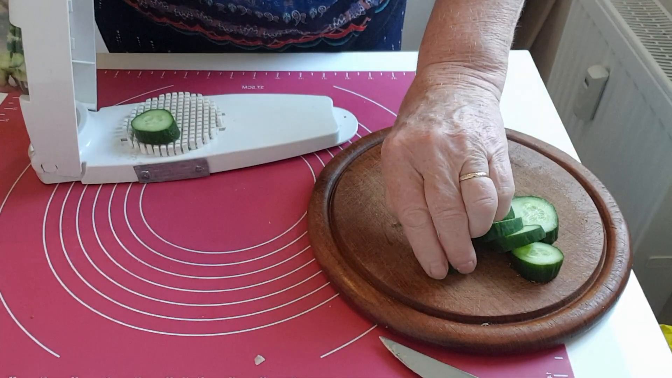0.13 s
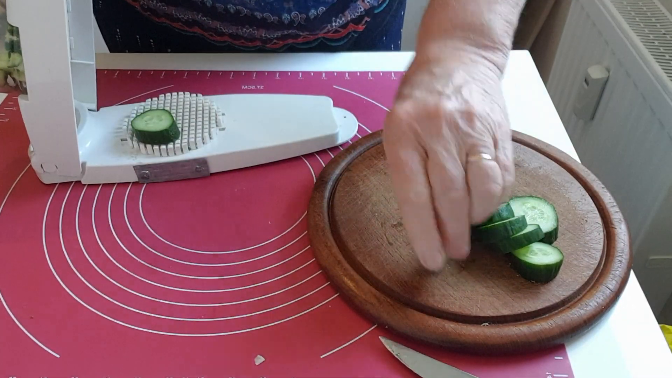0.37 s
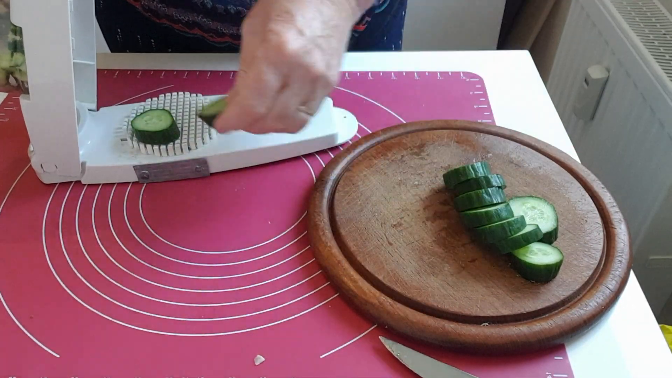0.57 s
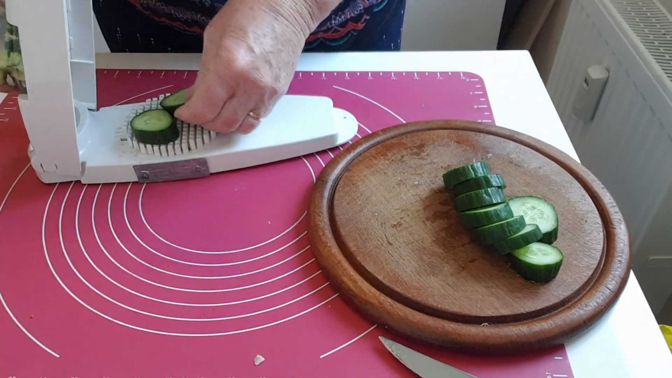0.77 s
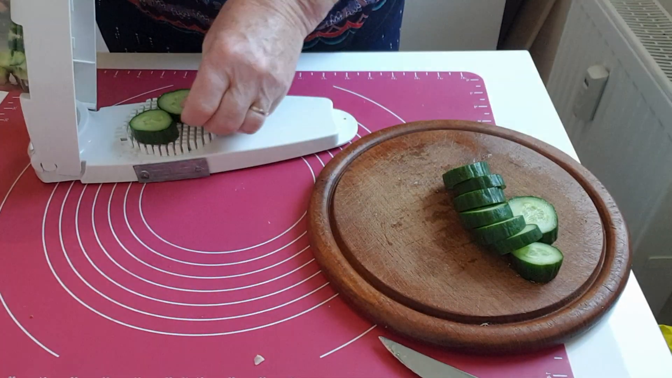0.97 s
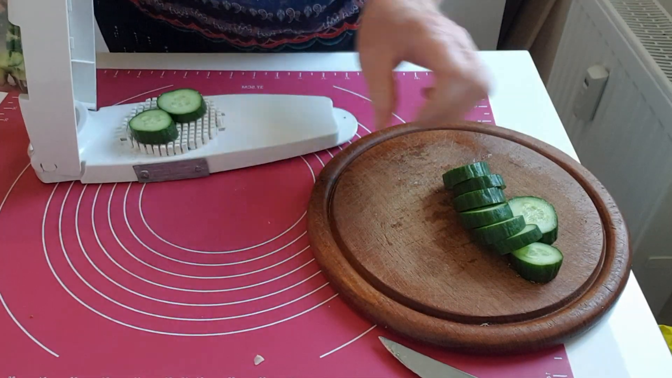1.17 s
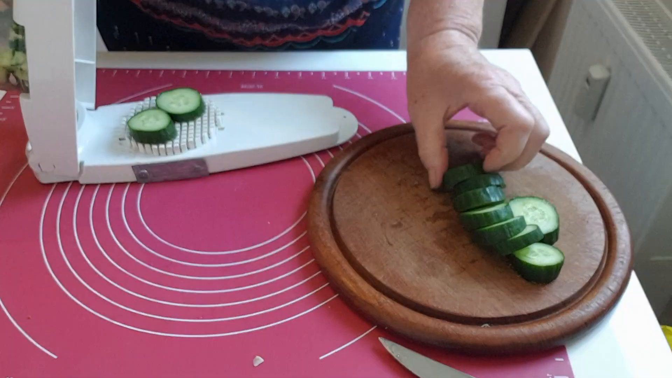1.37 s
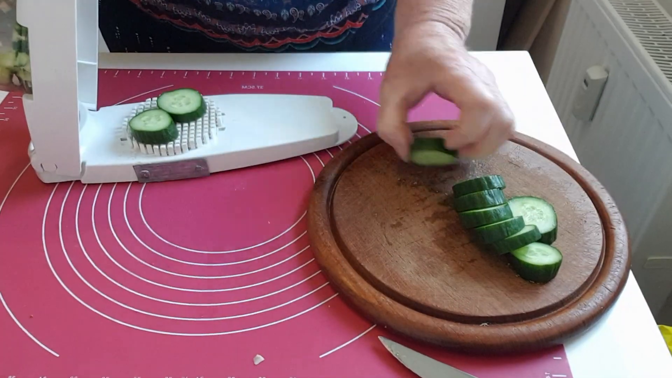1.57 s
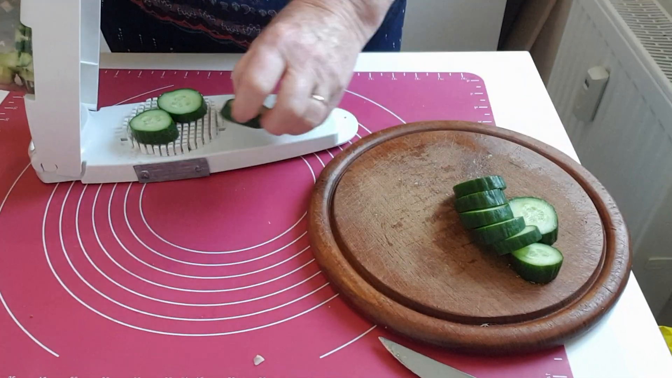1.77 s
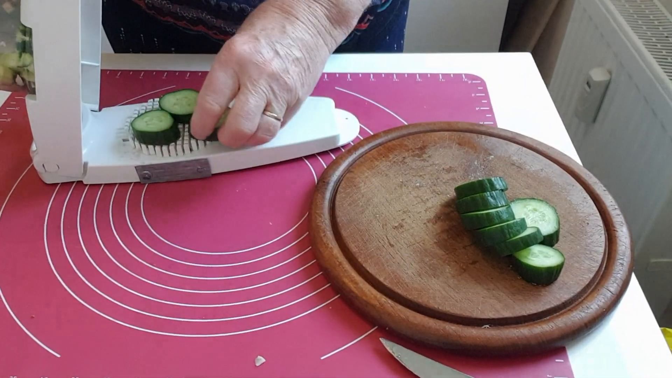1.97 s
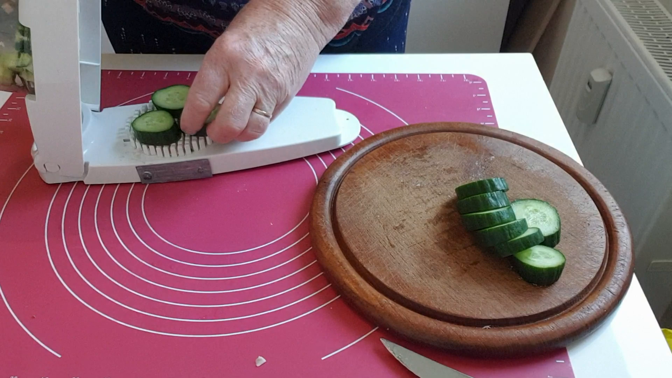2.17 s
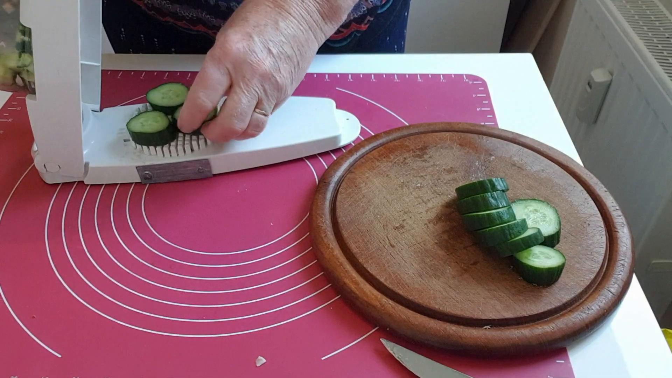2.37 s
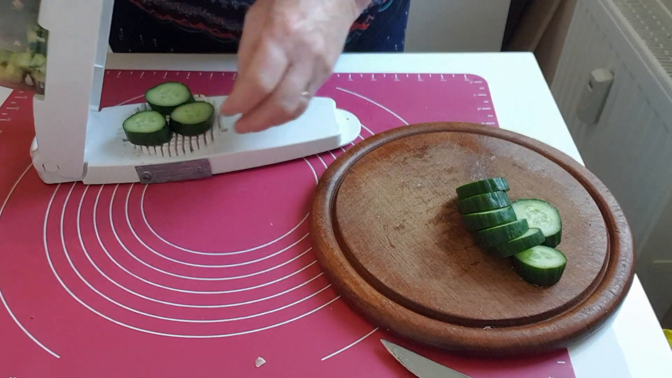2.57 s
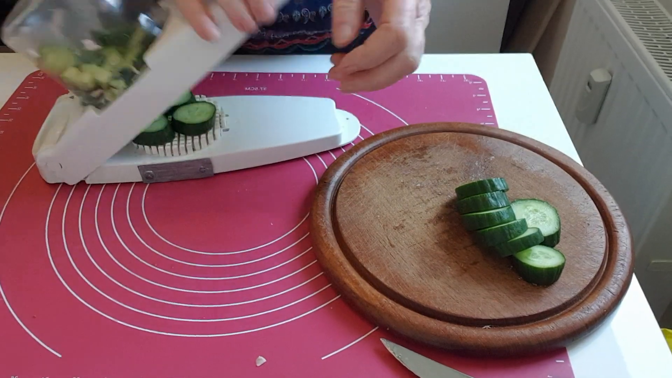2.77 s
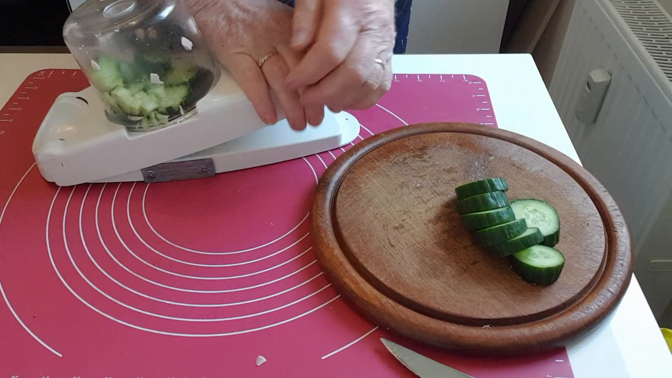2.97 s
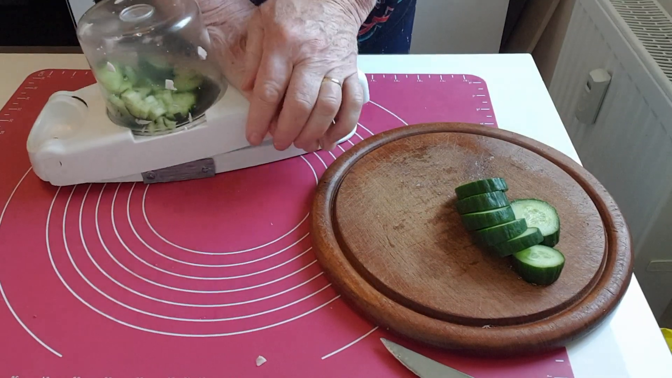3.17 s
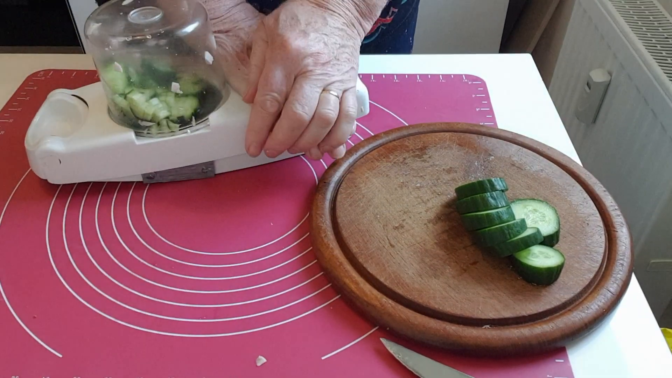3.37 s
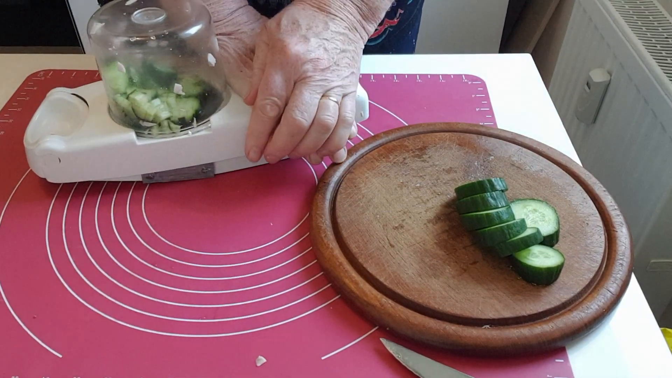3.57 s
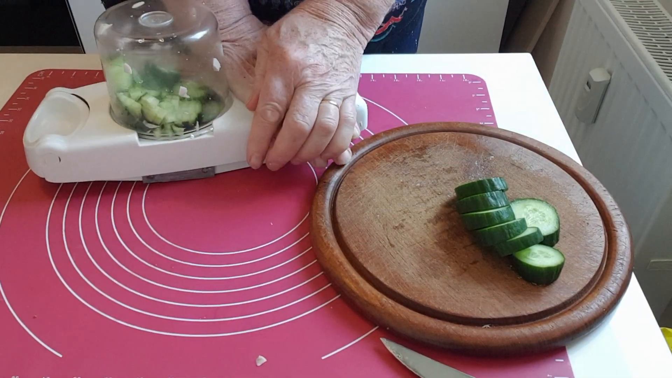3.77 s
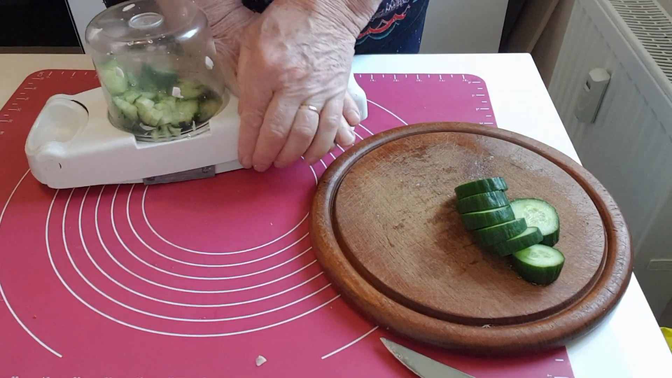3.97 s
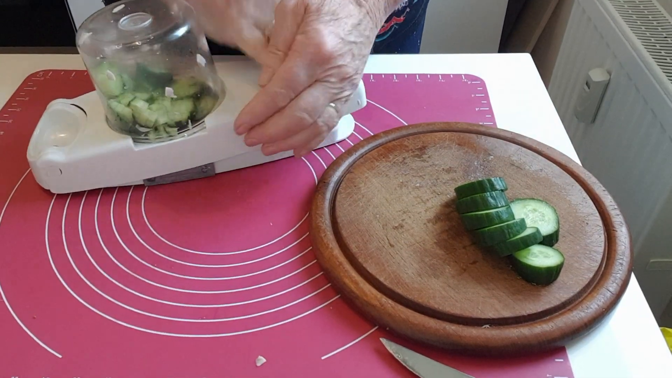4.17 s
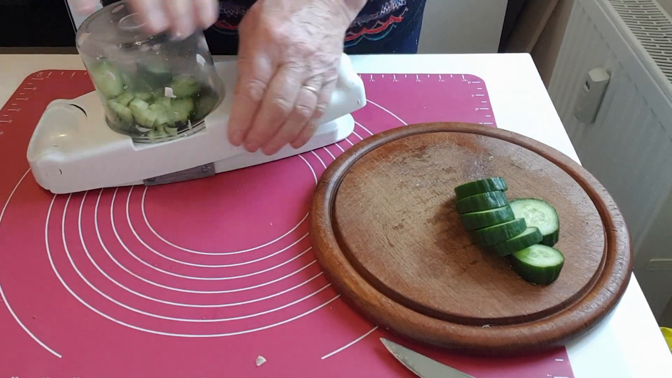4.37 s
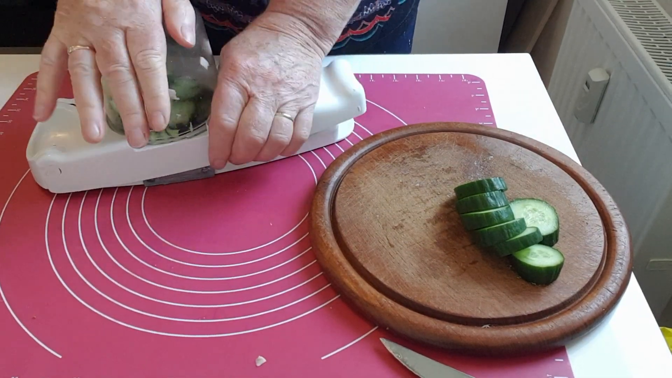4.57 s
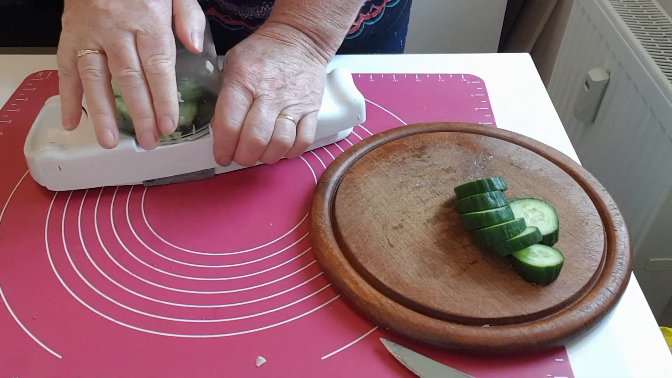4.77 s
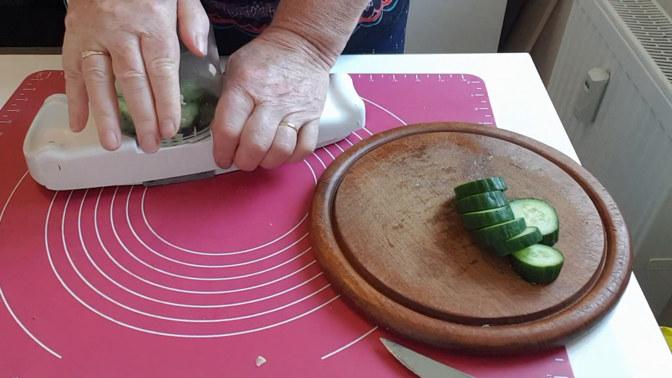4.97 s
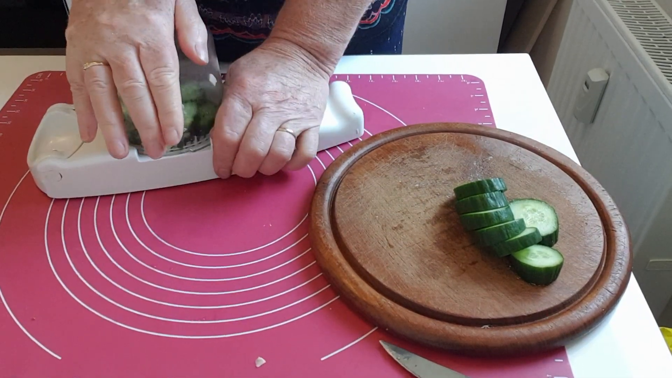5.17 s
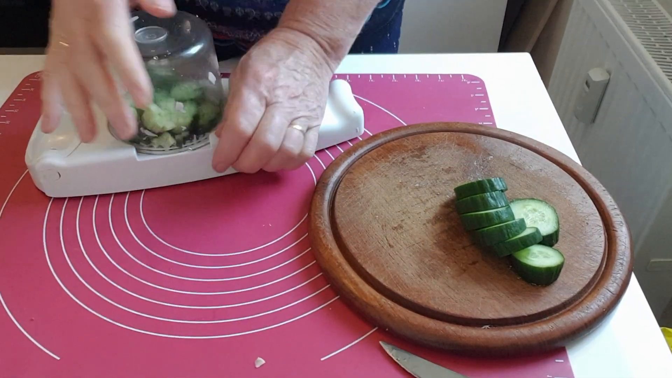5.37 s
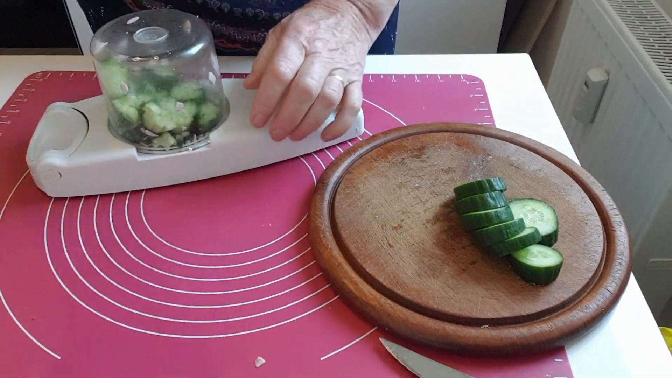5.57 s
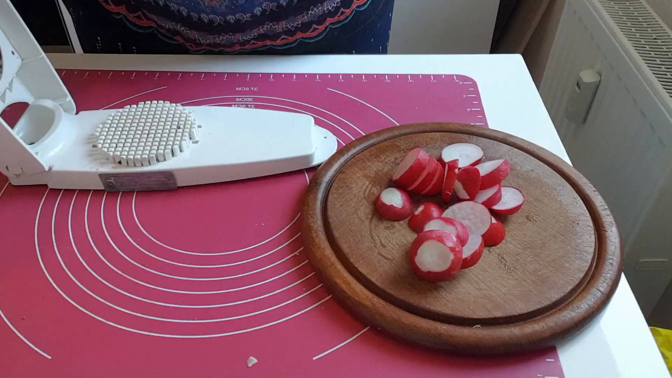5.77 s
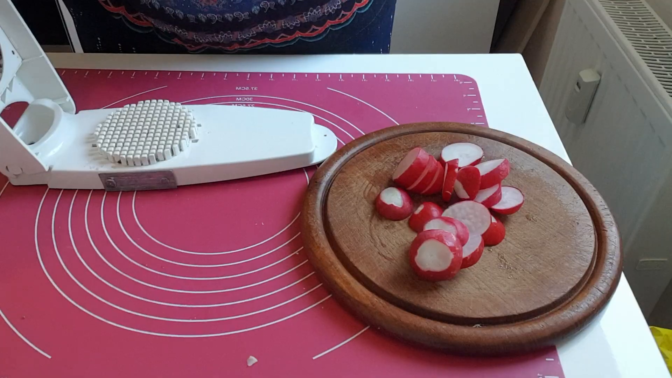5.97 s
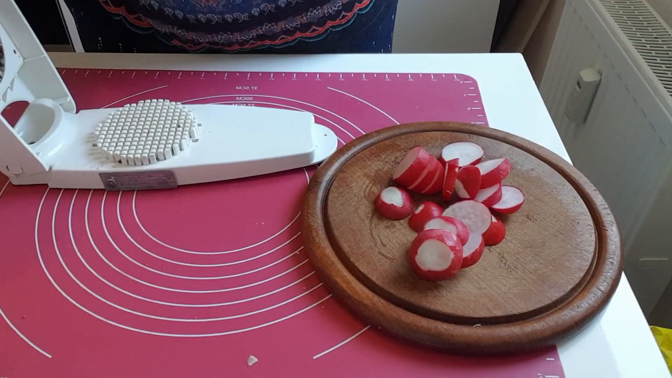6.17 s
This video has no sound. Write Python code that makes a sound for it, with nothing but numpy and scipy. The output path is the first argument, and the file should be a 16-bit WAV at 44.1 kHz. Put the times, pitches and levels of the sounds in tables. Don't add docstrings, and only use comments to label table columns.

```python
import sys
import numpy as np
from scipy import signal
from scipy.fft import rfft, irfft, next_fast_len
from scipy.io import wavfile
from scipy.ndimage import uniform_filter1d

SR = 44100
rng = np.random.default_rng(int(sys.argv[2]) if len(sys.argv) > 2 else 0)


def invert_db(level):
    return 10 ** (np.asarray(level, dtype=float) / 20)


def output_pcm(signal):
    pcm = np.clip(np.atleast_2d(signal).T, -1, 1) * 32767
    wavfile.write(sys.argv[1], SR, np.round(pcm).astype(np.int16))


N = 274460
TIME = np.arange(N) / SR
PORTS = np.array([[1], [-1]])


def unit(x):
    return x / np.sqrt(np.mean(x ** 2))


def colour(x, points):
    hz, db = np.transpose(points)
    size = next_fast_len(x.shape[-1])
    grid = np.log(np.maximum(np.arange(size // 2 + 1) * SR / size, 1))
    gain = invert_db(np.interp(grid, np.log(hz), db, left=-np.inf, right=-np.inf))
    return unit(irfft(rfft(x, size) * gain, size)[..., :x.shape[-1]])


def peaks(x, modes):
    return unit(sum(invert_db(db) * signal.lfilter(*signal.iirpeak(hz, hz / width, SR), x) for hz, width, db in modes))


def walk(rate):
    k = int(SR / rate)
    held = np.repeat(rng.standard_normal(N // k + 1), k)
    return 1.6 * uniform_filter1d(uniform_filter1d(held, k), k)[:N]


def grains(rate, spread_db):
    size_db = spread_db * np.minimum(rng.exponential(size=N), 4)
    return (rng.random(N) < rate / SR) * rng.standard_normal(N) * invert_db(size_db)


def spread(make, share):
    return make() + share * make() * PORTS


def add(out, sound, s, pan_db=0):
    start = int(max(s, 0) * SR)
    sound = sound[..., :N - start]
    out[:, start:start + sound.shape[-1]] += sound * invert_db(PORTS * pan_db / 2)


def near(modes, hz, octaves):
    return 1 / (1 + (np.log2(np.array(modes)[:, 0] / hz) / octaves) ** 2) ** 2


def ring(modes, gain, push):
    t = np.arange(SR // 2) / SR
    hz, db, t60 = np.transpose(modes)[:, :, None]
    free = np.sum(gain[:, None] * invert_db(db - 60 * t / t60) * np.sin(2 * np.pi * hz * t), axis=0)
    pushed = signal.fftconvolve(free[None], np.atleast_2d(push), axes=1)[:, :len(t)]
    return pushed / np.max(np.abs(pushed))


def strokes(rows):
    attack_db_per_s, release_db_per_s = 895, 297
    s, hold, db = np.transpose(rows)[:, :, None]
    below_db = attack_db_per_s * np.maximum(s - TIME, 0) + release_db_per_s * np.maximum(TIME - s - hold, 0)
    return invert_db(np.max(db - below_db, axis=0))


def hum(lines):
    beat_hz, beat_top_s = 1.785, .1
    beat = np.cos(2 * np.pi * beat_hz * (TIME - beat_top_s))
    out = 0
    for hz, db, beat_db, wobble_db in lines:
        level = invert_db(db + beat_db * beat + wobble_db * walk(9.0))
        out = out + np.sqrt(2) * level * np.sin(2 * np.pi * hz * TIME + 0.81 * walk(12.0))
    return out


def rumble(points):
    mid = colour(rng.standard_normal(N), points)
    side_points = [(hz, db + min(12 * np.log2(hz / 700), 0)) for hz, db in points]
    side = colour(rng.standard_normal(N), side_points)
    return (mid + invert_db(-13.0) * side * PORTS) * invert_db(1.4 * walk(4.4))


# f/Hz, level/dB per Hz
HISS = [(590, -31), (1000, -1), (1320, -9.5), (1450, -7.5), (3340, -12.5), (3500, -4), (3800, -14.5),
        (4310, -9), (5570, -18.5), (6940, -3), (7790, -10), (8360, -24.5), (12800, -10.5), (15100, -13),
        (16000, -14.5)]


def hiss():
    return colour(rng.standard_normal((2, N)), HISS) * invert_db(-80.5 + 7.0)


# f/Hz, width/Hz, level/dB
WHINE = [(586, 14, 4), (3558, 30, -7), (4468, 60, -10), (6724, 120, -5), (7510, 80, -6.5)]


def whine():
    return peaks(peaks(rng.standard_normal((2, N)), WHINE), WHINE) * invert_db(-82)


# f/Hz, level/dB per Hz
RUMBLE = [(15, -54.5), (25, -9.5), (92, 0.5), (154, -11), (209, -4), (300, -11.5), (394, -21.5), (537, -26),
          (605, -26), (743, -31), (1500, -51), (1950, -74), (3300, -120)]
LATER_RUMBLE = [(24, -50), (40, -14.5), (139, 1), (168, -18), (203, -1), (250, -11.5), (406, -11),
                (800, -28), (1570, -42.5), (2500, -79.5), (3250, -104), (5500, -120)]
# f/Hz, rms level/dB, beat depth/dB, wobble/dB
HUM = [(101, -64.5, 7, 1), (207, -60.5, 1, .8), (308, -83, 2, 3), (392, -87, 2, 4), (441.4, -89, 0, 3),
       (586.8, -87, 0, 2), (872, -96, 0, 2)]
LATER_HUM = [(97, -74, 2, 2.5), (134.6, -70, 2, 2), (199.2, -62.5, 1, 1.5), (296, -79, 1, 3),
             (319, -83, 1, 4), (398.4, -80, 1, 4), (420, -81, 1, 4), (522, -90, 1, 3), (554.5, -91, 1, 3),
             (754, -98, 1, 3)]


def kitchen():
    change_s, change_lasts_s = 5.3, 0.66
    change = np.clip((TIME - change_s) / change_lasts_s, 0, 1)
    first_db = -5 + (-38.5 + 5) * change
    opening_dip_db = -6 * np.clip((.33 - TIME) / 0.026, 0, 1)
    hiss_db = -6 + (-19.5 + 6) * np.clip((TIME - 5.33) / .15, 0, 1) + opening_dip_db
    later = invert_db(-8 * (TIME - change_s)) * np.clip((TIME - change_s) / 0.27 + 1, 0, 1)
    shake_db = 10.5 * np.clip((6.06 - TIME) / change_lasts_s, 0, 1)
    first_floor = rumble(RUMBLE) * invert_db(-60 + 5 * np.exp(-TIME / 0.02)) + hum(HUM)
    later_floor = rumble(LATER_RUMBLE) * invert_db(-68.5 + shake_db) + hum(LATER_HUM)
    airy = hiss() + whine() * invert_db(first_db / 3)
    return airy * invert_db(hiss_db) + first_floor * invert_db(first_db) + later * later_floor


# f/Hz, width/Hz, level/dB
BODY = [(136, 130, -1.5), (215, 110, 7.5), (333, 490, 2), (380.4, 30, 6), (473, 110, -0.5), (558, 16, -3.5)]
# t/s, hold/s, level/dB
RUBS = [(.005, 0.03, -69.5), (.355, 0.048, -69.5), (.69, 0.041, -88), (.825, 0.047, -65.5),
        (.98, 0.12, -72.5), (1.425, 0.066, -75), (1.97, 0.042, -69), (2.44, 0.057, -76), (2.5, 0.11, -78),
        (2.65, 0.051, -67), (2.74, 0.09, -65), (2.9, 0.029, -72.5), (3.17, 0.14, -65), (3.9, 0.12, -61),
        (4.07, 0.15, -67.5), (4.19, 0.12, -72.5), (4.35, .18, -80.5), (4.55, 0.16, -63.5)]


def grind(strain):
    texture = spread(lambda: peaks(peaks(grains(1200, spread_db=1.5), BODY), BODY), .3)
    return texture * (strokes(RUBS) + strain * invert_db(-2.5))


# f/Hz, level/dB, t60/s
TABLE = [(53.5, -8, 0.12), (73, 7, 0.22), (97.75, 2.5, 0.085), (110, -6, 0.46), (137.4, -1, 0.26),
         (153.3, -2.5, 0.1), (205, -14, 0.12), (212.5, 6.5, 0.18), (262, -18, 0.11), (331, -13, .1)]


def table_boom(hz, octaves):
    thud = np.diff(np.hanning(int(0.006 * SR)))
    return ring(TABLE, 0.15 * near(TABLE, 212, 0.25) + near(TABLE, hz, octaves), thud)


# f/Hz, level/dB, t60/s
LID = [(315.4, -16.5, 0.184), (375.5, 2, 0.059), (429, -7.5, 0.11), (517, 0, 0.083), (612, -5, 0.037),
       (765, -6, 0.2), (874, -4.5, 0.031), (986, -4.5, 0.094), (1231, 1, 0.021), (1096, 3, 0.05),
       (1347, -5, 0.05), (1526, -20.5, 0.94), (1639, -9, .08), (2100, 1.5, 0.049)]


def lid_rattle(draw, hz, octaves, rise_s, fall_s, side):
    t = np.arange(draw.shape[1]) / SR
    shake = uniform_filter1d(draw[0] + side * draw[1] * PORTS, size=int(SR / hz / 4), axis=1)
    lid = np.array(LID) * [1 + 0.015 * draw[0, -1], 1, 1]
    return ring(lid, near(LID, hz, octaves), shake * np.minimum(t / rise_s, 1) * np.exp(-t / fall_s))


def strike(out, s, table_db, table_hz, lid_db, lid_hz, octaves):
    draw = rng.standard_normal((2, SR // 10))
    add(out, invert_db(table_db - 9.5) * table_boom(table_hz, octaves), s + 0.0014, -.4)
    add(out, invert_db(lid_db - 0.5) * lid_rattle(draw, lid_hz, 0.4, 0.00076, 0.0075, 0.27), s + 0.0014, -.8)


# t/s, table level/dB, table f/Hz
TOUCHES = [(0.009, -40, 196), (0.03, -38, 151), (0.343, -37.5, 215), (0.359, -39.5, 150), (0.823, -32, 120),
           (0.834, -36, 212), (0.968, -36, 105), (0.975, -32.5, 217), (1.965, -32, 236), (2.108, -44, 205),
           (2.661, -36, 101), (2.732, -29.5, 61.5), (2.769, -30, 67.5), (2.624, -39.5, 96),
           (3.006, -23.5, 213.3), (3.023, -29, 210.6), (3.172, -33.5, 109), (3.252, -19, 220),
           (3.272, -25.5, 200), (3.296, -39, 148), (3.522, -43, 114.5), (4.599, -39, 113.3),
           (4.215, -31.5, 87.4), (4.555, -36.5, 110),
           (1.42, -31, 150),
    (2.61, -39.5, 222),
]


def touches():
    out = np.zeros((2, N))
    for s, db, hz in TOUCHES:
        strike(out, s, db, hz, db - 27.5, 450, octaves=0.35)
    return out


# f/Hz, level/dB per Hz
FIZZ = [(3500, -33.5), (5200, -6), (6800, -3), (8500, -13.5), (11000, -8), (15500, -9)]
# t/s, hold/s, level/dB
SQUELCHES = [
    (.35, 0.0038, -78),
    (.83, 0.14, -88.5),
    (3.8, 0.14, -76.5),
    (4.05, 0.059, -76.5),
    (4.17, 0.058, -74.5),
    (4.3, 0.015, -68),
    (4.51, .03, -79),
]


def fizz(effort):
    texture = spread(lambda: colour(grains(9000, spread_db=2.0), FIZZ), .9) * invert_db(1.5 * walk(40))
    return texture * (strokes(SQUELCHES) + effort * invert_db(-13))


# f/Hz, width/Hz, level/dB
SCRAPE = [(1760, 28, -6), (2080, 110, 4.5), (2810, 140, 2), (3470, 330, 6.5)]
# t/s, hold/s, level/dB
SLIDES = [
    (.83, 0.045, -81),
    (.89, 0.055, -78),
]


def scrape():
    return peaks(peaks(grains(1500, spread_db=0.0), SCRAPE), SCRAPE) * strokes(SLIDES)


# t/s, level/dB, lid f/Hz, crack level/dB
KNOCKS = [(0.83, -58, 930, -88), (2.729, -47.5, 853, -53), (2.953, -30.5, 810, -35),
          (2.983, -29.5, 720, -31.5), (3.094, -28, 910, -28), (3.107, -36, 800, -36),
          (3.1693, -33.5, 900, -30.5), (3.18, -37.5, 1100, -32), (3.19, -30, 860, -38),
          (3.205, -44, 944, -48), (3.218, -37, 1200, -47), (3.248, -29.5, 880, -47),
          (3.258, -26, 1070, -23), (3.264, -35, 1137, -19), (3.284, -46, 890, -34),
          (3.295, -45, 990, -36.5), (3.505, -46.5, 930, -44), (3.52, -37.5, 910, -29.5),
          (3.545, -41.5, 980, -54), (3.578, -39, 920, -59), (3.96, -64, 980, -85), (3.706, -19, 1100, -19),
          (3.71, -31, 1060, -25), (3.724, -28.5, 802, -43), (3.735, -39, 930, -49), (3.774, -50, 1080, -53),
          (3.976, -45.5, 990, -69), (4.14, -50, 1150, -63), (4.241, -52, 1190, -81),
          (4.572, -41, 1250, -71), (4.658, -42, 1170, -71), (4.704, -43.5, 1250, -51.5),
          (4.809, -46, 920, -72), (5.023, -50, 520, -64), (5.052, -43, 900, -19), (5.061, -9.5, 812, -11.5),
          (5.07, -8.5, 1004, -11), (5.078, -2, 850, -9.5), (5.088, -9.5, 906, -10), (5.097, -13.5, 817, -9),
          (5.11, -22, 890, -14), (5.125, -13, 915, -14)]


def knocks():
    out, t = np.zeros((2, N)), np.arange(SR // 10) / SR
    crack_colour = [(1200, 11.5), (2500, 3.5), (6500, -6.5), (8500, -20.5), (15500, -25.0)]
    for s, db, hz, crack_db in KNOCKS:
        draw = rng.standard_normal((4, len(t)))
        add(out, invert_db(db - 4.5) * lid_rattle(draw, hz, 0.11, 0.0016, 0.0068, 0.6), s, -2.8)
        burst = (draw[2] + 0.89 * draw[3] * PORTS) * np.exp(-t / 0.011)
        crack = colour(burst, crack_colour) * (1 - t / t[-1]) ** 2
        add(out, invert_db(crack_db - 8.5) * crack / np.max(np.abs(crack)), s, -2.2)
    return out


# f/Hz, width/Hz, level/dB
CREAK = [(770, 180, -5), (913, 120, 15), (1095.5, 290, 15), (1432, 300, -7), (2090, 250, -6.5)]
# t/s, hold/s, level/dB
CREAKS = [
    (.84, 0.13, -77.5),
    (2.47, .03, -78),
    (2.505, 0.024, -75),
    (2.735, 0.032, -67.5),
    (3.93, .09, -83),
    (3.98, 0.072, -71),
    (4.145, 0.063, -69.5),
    (4.57, 0.096, -70),
]


def creak(strain):
    texture = spread(lambda: peaks(peaks(grains(1500, spread_db=1.5), CREAK), CREAK), .9)
    return texture * (strokes(CREAKS) + strain * invert_db(-11))


# t/s, level/dB, f/Hz, breadth/dB, length/ms
TICKS = [(1.071, -73, 3550, -32, 6), (1.072, -70, 1320, -32, 7), (1.2987, -51, 4800, -8, 5.5),
         (1.299, -56.5, 2370, -4, 30), (1.4606, -62.5, 6850, -11, 13), (2.296, -64, 2050, -12, 5.3),
         (2.52, -63.5, 5650, -11, 94), (2.953, -36, 2170, -21, 19), (3.052, -34, 2100, 1, 9.4),
         (3.706, -28, 2057, -28, 10), (3.504, -56, 2040, 0, 7.3), (3.8117, -37.5, 2010, 8, 4.1),
         (3.978, -55, 2100, -32.5, 11), (3.999, -49.5, 2210, 2.5, 11), (4.048, -47.5, 6850, -8, 7.5),
         (4.285, -53, 7000, -21, 26), (4.573, -55.5, 1375, -32, 64), (4.7038, -44, 5570, -15, 4),
         (4.807, -40, 6430, -14, 5)]


def ticks():
    out, t = np.zeros((2, N)), np.arange(SR // 5) / SR
    for s, db, hz, skirt_db, ms in TICKS:
        draw = rng.standard_normal((2, len(t)))
        burst = (draw[0] + 1.1 * draw[1] * PORTS) * np.exp(-t * 1000 / max(ms, 1))
        points = [(500, skirt_db - 15.5), (hz / 1.2, skirt_db), (hz, 0), (hz * 1.1, skirt_db),
                  (15800, skirt_db - 10.5)]
        snap = colour(burst, points) * (1 - t / t[-1]) ** 2
        add(out, invert_db(db - 2.0) * snap / np.max(np.abs(snap)), s, -3.5)
    return out


# t/s, cutting effort level/dB, lid strain level/dB
PRESSES = [
    [(2.94, -72, -77), (2.952, -43, -33), (2.992, -54.5, -35), (3.068, -60, -49), (3.11, -42, -43.5),
     (3.146, -52.5, -46), (3.176, -47.5, -56.5), (3.26, -37.5, -35.5), (3.34, -68, -59)],
    [(3.38, -62, -55.5), (3.498, -61.5, -63), (3.512, -46.5, -49), (3.662, -49, -51.5), (3.695, -44, -46.5),
     (3.708, -27, -22), (3.735, -56.5, -36), (3.77, -58, -39.5), (3.9, -75, -72)],
    [(4.69, -75, -66), (4.702, -56, -53.5), (4.766, -65, -73.5), (4.816, -56.5, -58), (4.96, -57, -64),
     (5.02, -51.5, -53), (5.048, -41.5, -42.5), (5.054, -26.5, -30), (5.1, -41.5, -18.5)],
]
PRESS_TEAR_DB = [
    0,
    2,
    -5.5,
]


def presses():
    effort = cutting = strain = load = 0
    for (s, effort_db, strain_db), flesh_db in zip(map(np.transpose, PRESSES), PRESS_TEAR_DB):
        during = strokes([(s[0], s[-1] - s[0], 0)])
        press_effort = invert_db(np.interp(TIME, s, effort_db)) * during
        press_strain = invert_db(np.interp(TIME, s, strain_db)) * during
        effort = effort + press_effort
        cutting = cutting + press_effort * invert_db(flesh_db)
        strain = strain + press_strain
        load = load + np.minimum(press_strain, invert_db(-44))
    return effort, cutting, strain, load


# f/Hz, level/dB per Hz
TEAR = [(760, -37.5), (1300, -8), (1680, -3.5), (2610, -4), (2830, -8.5), (3090, -2.5), (4200, -1.5),
        (9000, -20.5), (11700, -48.5), (19800, -120)]


def tear(cutting):
    texture = spread(lambda: colour(grains(9000, spread_db=1.6), TEAR), .9) * invert_db(1.2 * walk(30))
    return texture * cutting * invert_db(-9)


# f/Hz, level/dB
HEAVE = [(35, -20), (70, -4), (105, -0.5), (150, -10), (260, -37.5)]


def heave(load):
    return colour(grains(300, spread_db=-2.5), HEAVE) * load * invert_db(-4.5)


# t/s, table level/dB, table f/Hz, lid level/dB, lid f/Hz
BLOWS = [(2.953, -16.5, 157, -29.5, 294), (2.965, -19.5, 91.4, -42, 377), (2.98, -11, 215, -17.5, 515),
         (3.03, -36.5, 100.8, -32.5, 499), (3.069, -25.5, 99.6, -43, 517), (3.134, -32.5, 72.4, -44.5, 513),
         (3.169, -33.5, 90, -36, 450), (3.19, -35, 88.3, -38.5, 480), (3.215, -41, 91, -35, 480),
         (3.246, -22, 80, -28, 450), (3.33, -37.5, 80, -35.5, 470), (3.078, -44, 199, -38, 517),
         (3.118, -32, 210, -30, 490.4), (3.685, -31, 105, -44, 500), (3.096, -22, 217, -29, 491),
         (3.261, -45, 194.4, -33.5, 381), (3.28, -20.5, 115.9, -30, 481), (3.31, -20.5, 77.3, -34, 474.6),
         (3.702, -1, 192.5, -29.5, 301), (3.708, -3, 77.6, -37, 564), (3.776, -15, 146, -41, 544),
         (3.973, -29.5, 126, -47, 293), (4.193, -31, 106.6, -47.5, 355), (4.571, -40.5, 56.4, -46.5, 367),
         (4.653, -24, 113.1, -30.5, 338), (4.708, -43.5, 105.2, -47, 376), (5.049, -3.5, 130.5, -25, 320.3),
         (5.059, -3.5, 141.6, -12.5, 312), (5.067, 2, 130, -11.5, 334.4), (5.075, 1, 95, -12.5, 388.5),
         (5.087, -4.5, 225, -10, 517), (5.096, -4.5, 73, -15, 517), (5.109, -11, 76.3, -23, 508),
         (5.124, -35, 97.8, -18.5, 501.4), (5.14, -25.5, 78.8, -21.5, 562), (5.154, -46, 76, -26, 440.3),
         (5.189, -30, 120, -24.5, 599), (5.224, -34.5, 104.6, -35.5, 510), (5.29, -40.5, 196, -36, 350.5),
         (5.346, -52.5, 198.8, -42, 381)]


def blows():
    out = np.zeros((2, N))
    for s, table_db, table_hz, lid_db, lid_hz in BLOWS:
        strike(out, s, table_db, table_hz, lid_db, lid_hz, octaves=.45)
    return out


def squeak():
    start_s, end_s = span_s = (4.95, 5.05)
    pitch_hz = np.interp(TIME, span_s, (2200, 2390)) * (1 + .012 * walk(200))
    level = invert_db(np.interp(TIME, span_s, (-86, -71)) + 2.5 * walk(60))
    return np.sin(2 * np.pi * np.cumsum(pitch_hz) / SR) * level * strokes([(start_s, end_s - start_s, 0)])


# f/Hz, level/dB, t60/s
BLADES = [(1540, -21, .9), (3343, 6, .28), (3714, -5, .28), (4264, 3, .36), (5179, -5, .36), (5803, 5, .27),
          (7020, 5, .32), (7833, -8, .36), (8861, -12, .24), (10200, -13, .2), (12080, -6, .17),
          (12380, -2, .18), (13600, -10, .15), (14800, -5, .19)]


def blades():
    out = np.zeros((2, N))
    sound = ring(BLADES, np.ones(len(BLADES)), np.eye(5)[[0, 4]])
    swell = np.minimum(np.arange(sound.shape[1]) / SR / .025, 1)
    add(out, invert_db(-23.5) * sound * swell, 5.135, -2.2)
    return out


def ping():
    out = np.zeros((2, N))
    add(out, invert_db(-73) * ring([(2660, 0, .12)], np.ones(1), np.hanning(40)), 5.752)
    return out


# f/Hz, t60/s, wet level/dB
ROOM = [(88.6, 0.44, -7), (230, 0.5, -8), (600, 0.49, -7.5), (2100, 0.4, -1.5), (4850, 0.36, -1),
        (11800, 0.38, 2)]


def room(dry):
    t = np.arange(int(.7 * SR)) / SR
    echo = 0
    for k, (hz, t60, db) in enumerate(ROOM):
        below = ROOM[k - 1][0] if k else 30
        above = ROOM[k + 1][0] if k + 1 < len(ROOM) else 16000
        low, high = np.sqrt(below * hz), np.sqrt(hz * above)
        points = [(below, -30), (low, -3), (hz, 0), (high, -3), (above, -30)]
        mid, side = colour(rng.standard_normal((2, len(t))), points)
        width = min(.06 + (hz / 750) ** 1.5, 1.1)
        band = (mid + width * side * PORTS) * invert_db(-60 * t / t60) * np.clip(t / 0.0059, 0, 1)
        echo = echo + invert_db(db) * band * np.sqrt((high - low) / SR / np.sum(band ** 2) * 2)
    return dry + signal.fftconvolve(dry, echo, axes=1)[:, :N]


def scene():
    effort, cutting, strain, load = presses()
    worked = grind(strain) + fizz(effort) + scrape() + creak(strain) + tear(cutting) + heave(load) + squeak()
    chopper = room(worked * invert_db(-1.1 * PORTS) + touches() + knocks() + ticks() + blows())
    air = signal.sosfiltfilt(signal.butter(4, 8200, "high", fs=SR, output="sos"), chopper)
    lost = (1 - invert_db(-6)) * np.clip((TIME - 5.15) / .012, 0, 1)
    return chopper - lost * air + blades() + ping() + kitchen()


def band_limit(x):
    return signal.sosfilt(signal.butter(12, 15800, fs=SR, output="sos"), x)


def record(dry):
    heard = signal.sosfilt(signal.butter(3, 42, "high", fs=SR, output="sos"), dry)
    rounded = 1.2 * np.tanh(1.12 * heard)
    return band_limit(rounded)


dry = scene()
out = record(dry)
output_pcm(out)
```